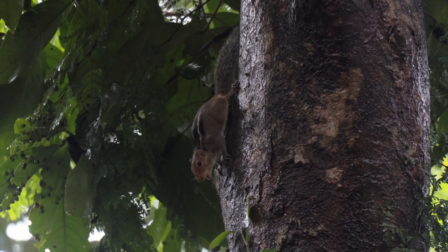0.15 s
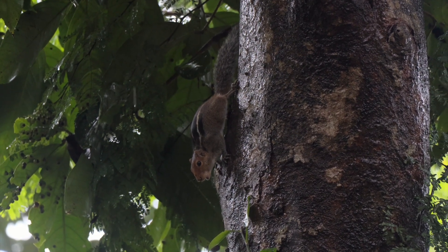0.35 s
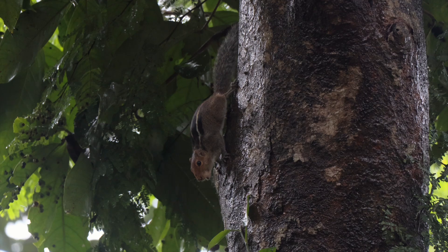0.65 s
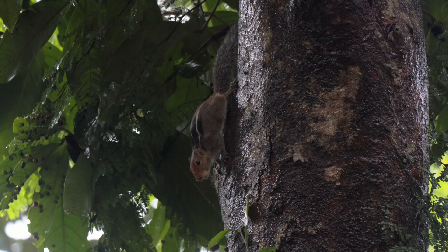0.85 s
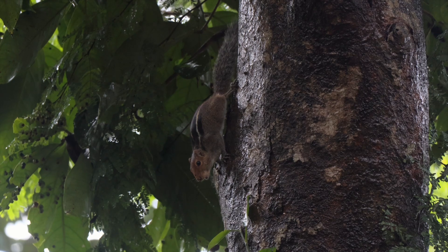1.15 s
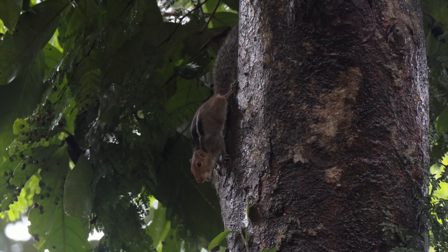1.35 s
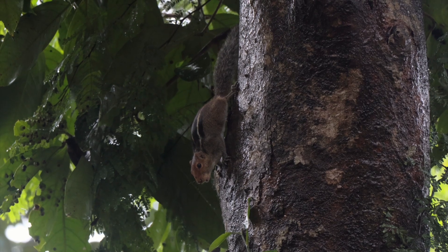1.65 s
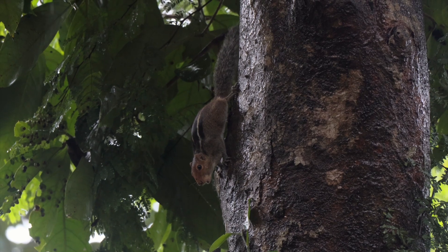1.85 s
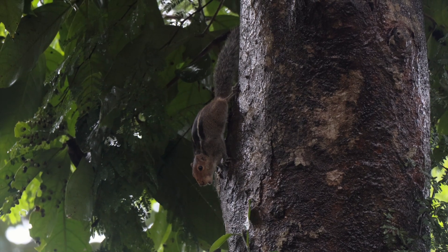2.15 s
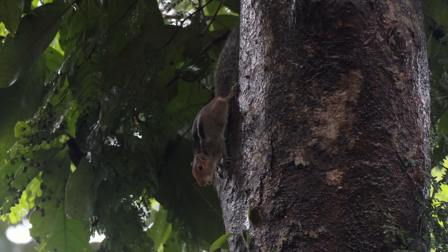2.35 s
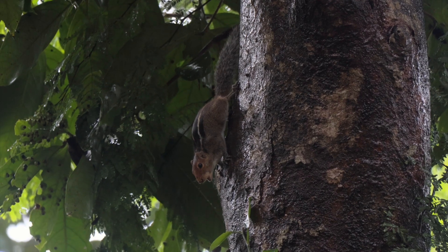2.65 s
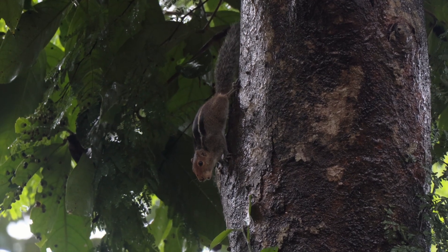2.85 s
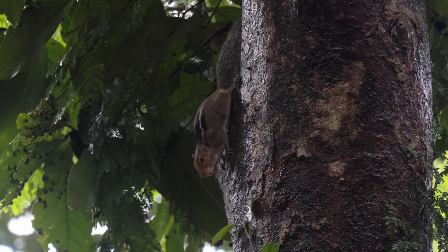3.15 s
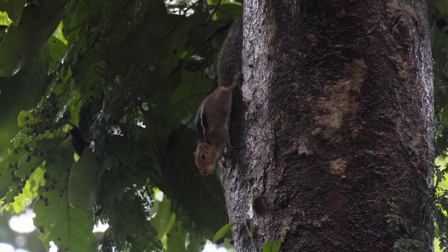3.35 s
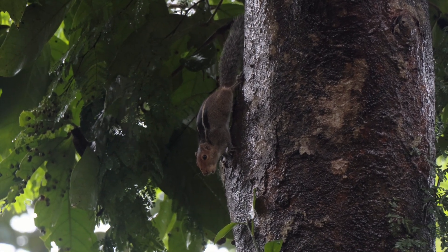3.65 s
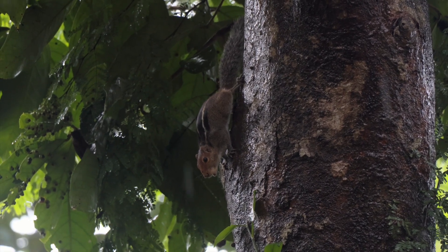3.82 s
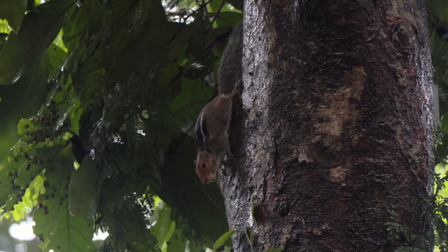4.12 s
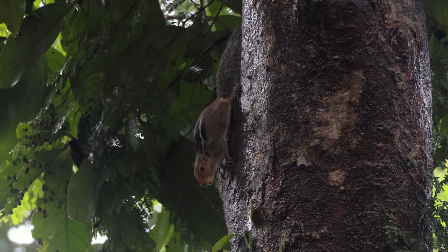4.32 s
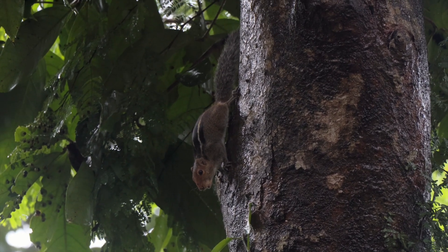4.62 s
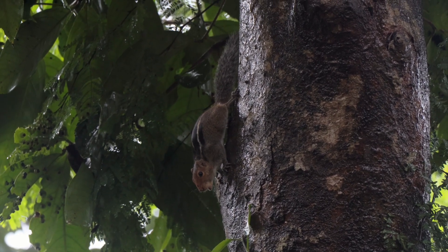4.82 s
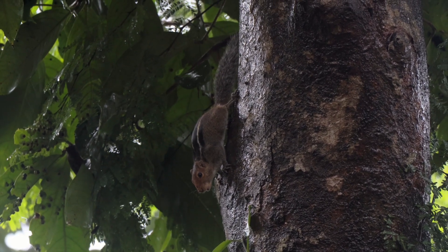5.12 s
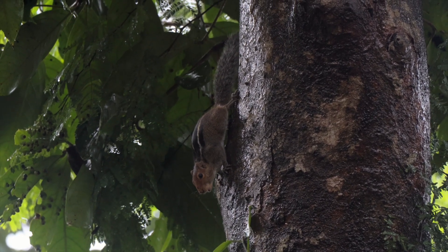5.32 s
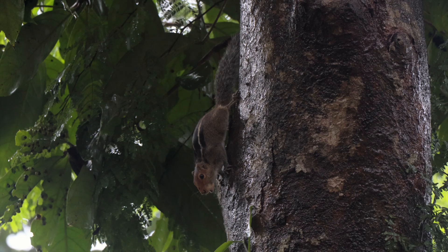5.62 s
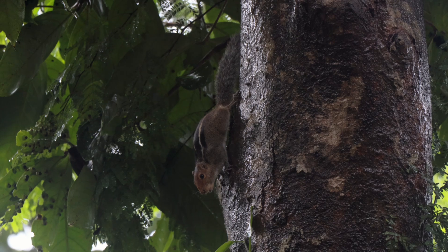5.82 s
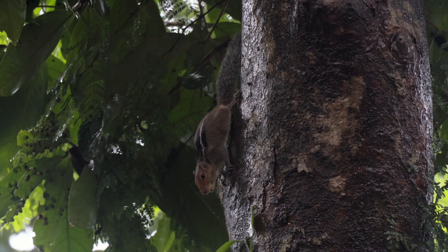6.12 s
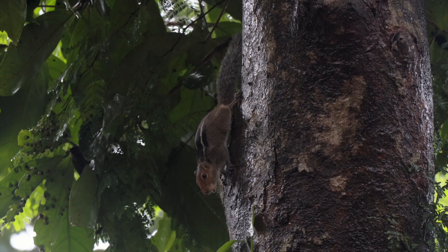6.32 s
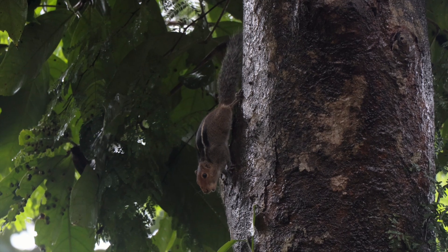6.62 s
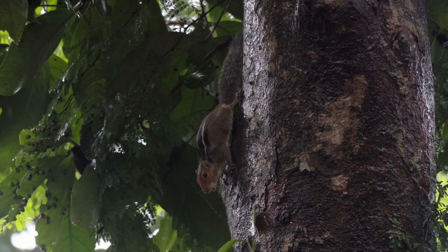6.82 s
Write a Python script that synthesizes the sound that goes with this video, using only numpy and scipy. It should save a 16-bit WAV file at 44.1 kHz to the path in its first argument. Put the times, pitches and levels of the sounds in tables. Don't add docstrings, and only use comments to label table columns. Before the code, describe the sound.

The end of a squirrel chirp opens the scene, then over twenty more calls run through all seven seconds, usually 0.3 to 0.4 seconds apart. Each lasts under a tenth of a second: a piercing whistle falling from about 4 to 2 kHz, with a quick upward bounce and final drop. A softer note closely follows the one at 0.25; the call at 4.1 slides longer. Faint low gulps follow many calls. Short branch and wall echoes blur into a brief airy tail. Light rain hisses steadily, with tiny leaf pops. Bright drips ring at 0.25, 1.77 and 5.0; leaf taps and thuds cluster around 2.3 to 2.8, with ticks near 4.4 and a fuller thud at 5.3. A thin insect hiss near 9 kHz persists. Distant traffic hum swells slightly around 2 and 5. The calls sit slightly left, within wide outdoor ambience; the last begins just before the cut.

```python
import sys
import numpy as np
from scipy import signal
from scipy.fft import rfft, irfft, next_fast_len
from scipy.io import wavfile
from scipy.ndimage import uniform_filter1d, map_coordinates

SR = 44100
rng = np.random.default_rng(int(sys.argv[2]) if len(sys.argv) > 2 else 0)


def dump(signal):
    limited = np.clip(np.atleast_2d(signal).T, -1, 1)
    pcm = np.round(limited * 32767).astype(np.int16)
    wavfile.write(sys.argv[1], SR, pcm)


def elevation(decibels):
    levels = np.asarray(decibels, float)
    return 10 ** (levels / 20)


N = 307377
PAD = SR // 10


def along(points, hz):
    point_hz, value = np.transpose(points)
    return np.interp(np.log(hz + 1), np.log(point_hz + 1), value)


def curve(rows, column):
    columns = np.transpose(rows)
    return np.interp(np.arange(N) / SR, columns[0], columns[column])


def unit(x):
    return x / np.sqrt(np.mean(x ** 2) + 1e-20)


def wobble(rate_hz):
    knots = rng.standard_normal(int(N * rate_hz / SR) + 4)
    return map_coordinates(knots, [np.arange(N) * rate_hz / SR])


def filtered(x, response):
    size = next_fast_len(x.shape[-1] + 8192)
    spectrum = rfft(x, size) * response(np.fft.rfftfreq(size, 1 / SR))
    return irfft(spectrum, size)[..., :x.shape[-1]]


def lagged(x, seconds):
    keep = np.exp(-1 / (abs(seconds) * SR))
    return signal.lfilter([1 - keep], [1, -keep], x)


def add(out, start_s, sound):
    part = out[..., round(start_s * SR):][..., :sound.shape[-1]]
    part += sound[..., :part.shape[-1]]


def lead(radians):
    return lambda hz: np.exp(1j * radians(hz) / 2 * np.array([[1], [-1]]))


# pitch_hz, likeness (1 same, -1 opposite)
LIKENESS = [(40, 1), (130, 0.86), (290, 0.9), (640, 0.96), (1400, 1), (3100, 0.84), (6800, 0.45),
            (15000, -0.72)]


def widen(pair, gain):
    def mid_side(hz):
        turn = np.arccos(np.clip(along(LIKENESS, hz), -1, 1)) / 2
        return gain(hz) * [np.cos(turn), np.sin(turn)]
    mid, side = filtered(pair, mid_side)
    return np.array([mid + side, mid - side])


# pitch_hz, density_db per Hz
HUM_COLOUR = [(15, -37), (25, -29), (65, 2), (151, -10.5), (200, -12.5), (260, -44), (440, -120)]
# time_s, level_db
TRAFFIC_LEVEL = [
    (0, -55),
    (.6, -57),
    (1.6, -56.5),
    (1.95, -51),
    (2.3, -57.5),
    (4.3, -54),
    (5.1, -50),
    (5.6, -54),
    (6.1, -51.5),
    (6.97, -54),
]


def traffic():
    level_db = curve(TRAFFIC_LEVEL, column=1) + 1.1 * wobble(2.92)
    hum = widen(rng.standard_normal((2, N)), lambda hz: elevation(along(HUM_COLOUR, hz)))
    return elevation(level_db + 0.7) * unit(hum)


# pitch_hz, density_db per Hz
RAIN_COLOUR = [(76, -15.5), (130, -9), (264, -5), (490, -6), (800, -4.5), (1580, -1.5), (2480, -0.5),
               (4380, -6), (8000, -10.5), (10000, -14.5), (12000, -13), (13400, -17.5), (15000, -17),
               (15900, -45)]
# time_s, level_db
SHOWER_LEVEL = [
    (0, -42.5),
    (3.3, -42.5),
    (4.3, -43),
    (5.1, -41.5),
    (5.7, -42.5),
    (6.3, -43.5),
    (6.97, -43.5),
]


def rain():
    noise = signal.stft(rng.standard_normal((2, N)), nperseg=512)[2]
    patches = rng.standard_normal(noise.shape[1:])
    patches = uniform_filter1d(uniform_filter1d(patches, 6, 0), 10, 1)
    hiss = unit(signal.istft(noise * elevation(2.5 * unit(patches)), nperseg=512)[1][:, :N])
    hits = (rng.random((2, N)) < 1500 / SR) * rng.standard_normal((2, N))
    hits = hits * elevation(3 * rng.exponential(size=(2, N)).clip(0, 3))
    bed = widen(hiss + 0.33 * unit(hits), lambda hz: elevation(along(RAIN_COLOUR, hz)))
    level_db = curve(SHOWER_LEVEL, column=1) + 7 + 0.6 * wobble(4.38)
    return elevation(level_db) * unit(bed)


def leaf_pops():
    pops = np.zeros((2, N))
    t = np.arange(SR // 40) / SR
    for when, pitch, size, side in rng.random((280, 4)):
        ring = elevation(-60 * t / 0.005) * np.sin(2 * np.pi * 500 * 8 ** pitch * t)
        ring = ring * (1 - np.exp(-t / .0006))
        pan = elevation([[3.5 * side - 1.2], [1.2 - 2.5 * side]])
        add(pops, when * N / SR, elevation(-44.5 + 10 * size ** 2) * ring * pan)
    return pops


# time_s, share of the higher band (0-1), level_db
INSECT_SONG = [
    (0, .7, -39),
    (1.0, 0.9, -41),
    (1.7, 0.8, -41.5),
    (2.3, .6, -42.5),
    (4.2, 0.32, -44),
    (5.3, 0.13, -41),
    (6.97, 0.4, -42),
]


def insect():
    share = curve(INSECT_SONG, column=1).clip(0, 1)
    level_db = curve(INSECT_SONG, column=2) + .5 * wobble(2.6)
    strokes = elevation(0.52 * wobble(140) + 1.1 * wobble(13))
    high = widen(rng.standard_normal((2, N)), lambda hz: np.exp(-((hz - 9030) / 430) ** 2))
    low = widen(rng.standard_normal((2, N)), lambda hz: np.exp(-((hz - 8760) / 400) ** 2))
    return elevation(level_db + 3.5) * unit(strokes * (np.sqrt(share) * high + np.sqrt(1 - share) * low))


# start_s, peak_db, body_db
DROP_TICKS = [(0.0344, -28, 18), (0.2364, -37, 4), (1.0614, -35, 15), (2.14, -43, -2), (2.7222, -27, 15),
              (3.3538, -35, -3), (4.3306, -25, 9), (4.4453, -28, 14), (4.8539, -28, -5.5),
              (5.1372, -53, 12), (5.5548, -42, -2), (5.6316, -31.5, 3), (5.7897, -36, 1), (6.8593, -52, -5)]
# start_s, peak_db, pitch_hz
DRIP_PLINKS = [
    (0.25, -11, 4930),
    (1.6866, -26, 4450),
    (1.766, -17, 5070),
    (5.005, -14, 4940),
]
# start_s, peak_db, pitch_hz
LEAF_TAPS = [
    (2.305, -23, 3440),
    (2.554, -13, 2340),
    (3.4175, -21, 1820),
    (4.4503, -21, 1990),
    (4.4657, -19.5, 3540),
    (5.901, -32, 2360),
]
# start_s, peak_db, pitch_hz
DROP_THUDS = [
    (2.152, -28, 1260),
    (2.302, -19, 1155),
    (2.385, -24, 1135),
    (2.759, -18, 315),
    (4.844, -24, 945),
    (5.196, -41, 864),
    (5.29, -21, 692),
    (6.333, -25, 304),
]


def drops():
    out, t = np.zeros((2, N)), np.arange(SR // 20) / SR
    for start_s, peak_db, body_db in DROP_TICKS:
        colour = [(800, -33), (1500, body_db - 9), (6000, body_db - 3.0), (10000, 2), (16000, 2)]
        snap = elevation(-60 * t / 0.014) * rng.standard_normal(len(t))
        snap = filtered(snap, lambda hz: elevation(along(colour, hz)))
        add(out, start_s, elevation(peak_db - 4.0) * snap)
    for start_s, peak_db, pitch_hz in DRIP_PLINKS:
        ring = np.sin(2 * np.pi * pitch_hz * t) * (1 - np.exp(-t / 0.00073))
        add(out, start_s, elevation(peak_db + 0.5 - 60 * t / 0.0083) * ring)
    for start_s, peak_db, pitch_hz in LEAF_TAPS:
        add(out, start_s, elevation(peak_db - 5.5 - 60 * t / 0.011) * np.sin(2 * np.pi * pitch_hz * t))
    for start_s, peak_db, pitch_hz in DROP_THUDS:
        unsteady = .12 * np.cumsum(rng.standard_normal(len(t)))
        thud = (1 - np.exp(-t / 0.0013)) * np.sin(2 * np.pi * pitch_hz * t + unsteady)
        add(out, start_s, elevation(peak_db - 11.0 - 60 * t / 0.11) * thud)
    return out


# delay_s, level_db
ECHO_TAPS = [(0.005, -14), (0.0093, -15), (0.0119, -15), (0.017, -19), (0.0202, -21), (0.025, -21),
             (0.0278, -22), (0.0376, -20), (0.0405, -17), (0.0432, -17), (0.1139, -25)]
# pitch_hz, t60_s
GROVE_DECAY = [(1800, 0.16), (2500, 0.55), (3500, 0.57), (6000, 0.61), (11000, 0.6)]
# pitch_hz, level_db
LEAF_RETURN = [(2000, -9), (2550, -6), (3100, 2)]
# pitch_hz, level_db
FOLIAGE_COLOUR = [(1810, -1), (2480, -4), (3610, -2), (4200, -7), (4950, -13), (5610, -2), (6410, -5),
                  (7410, -21.5), (12100, 0)]


def grove(x):
    hz, t, noise = signal.stft(rng.standard_normal((2, SR)), SR, nperseg=256)
    rise = np.clip(t / .025, 0, 1)
    rise = rise * elevation(along(LEAF_RETURN, hz)[:, None] * np.exp(-(t / .032) ** 4))
    decay = elevation(-60 * t / along(GROVE_DECAY, hz)[:, None])
    tail = signal.istft(noise * rise * decay, SR, nperseg=256)[1][:, :SR]
    reply = elevation(-8) * widen(tail / np.linalg.norm(tail[0]), lambda f: np.sqrt(2) + 0 * f)
    fade = elevation(-60 * np.arange(SR // 100) / SR / .005)
    for delay_s, level_db in ECHO_TAPS:
        clump = np.zeros((1, SR // 5))
        side_lag_s = rng.uniform(-5e-5, 5e-5)
        blur = unit(fade * rng.standard_normal(len(fade))) / np.sqrt(len(fade))
        add(clump, delay_s, elevation(level_db + 1.5) * blur)
        clump = filtered(clump, lambda f: elevation(along(LEAF_RETURN, f) * (delay_s < .03)))
        reply[:, :clump.shape[1]] += filtered(clump, lead(lambda f: 2 * np.pi * f * side_lag_s))
    coloured = filtered(x, lambda f: elevation(along(FOLIAGE_COLOUR, f)))
    return signal.fftconvolve(coloured[None], reply, axes=1)[:, :len(x)]


# start_s, peak_db, pitch_hz
GULP_EVENTS = [(0.801, -32, 792), (1.167, -39, 677), (1.517, -35.5, 687), (1.913, -27.5, 800),
               (2.844, -28.5, 800), (3.18, -32, 637), (3.601, -40, 633), (4.585, -55, 646),
               (4.978, -39, 686), (5.409, -34, 654), (5.746, -39, 796), (6.115, -36, 830),
               (6.426, -41, 940)]


def gulps():
    out, t = np.zeros(N), np.arange(SR // 10) / SR
    for start_s, peak_db, pitch_hz in GULP_EVENTS:
        glide_hz = pitch_hz * (1.12 - 5 * t)
        swell = elevation(peak_db - 4.0) * np.exp(-((t - .008) / 0.015) ** 2)
        add(out, start_s, swell * np.sin(2 * np.pi * np.cumsum(glide_hz) / SR))
    return out


def call_pitch(t, top_hz, fall_s, turn_s, turn_hz, low_hz):
    drop = low_hz + (top_hz - low_hz) * np.clip(1 - (t / fall_s) ** 1.2, 0, 1) ** 1.9
    drop += 126 * np.exp(-((drop - 2234) / 140) ** 2)
    bend = 3.8e6
    arch = turn_hz - bend * (t - turn_s) ** 2
    end_s = turn_s + np.sqrt(abs(turn_hz - 1700) / bend) + .004 + .1 * max(fall_s - turn_s, 0)
    pitch = np.maximum(np.where(t < turn_s, drop, 0), arch).clip(1700)
    pitch = uniform_filter1d(pitch, size=90)
    return pitch * (1 - 0.27 * np.exp(-t / 0.0016)), end_s


# start_s, level_db, top_hz, fall_s, bounce_top_hz
CALLS = [(-0.049, -13, 3860, 0.051, 2474), (0.2524, -10.5, 4054, .048, 1945),
         (0.706, -12, 3870, 0.053, 2485), (1.0722, -11.5, 3920, 0.05, 2412),
         (1.4222, -11.5, 3974, .051, 2000), (1.8164, -12, 3910, 0.055, 2544),
         (2.183, -11.5, 3980, 0.051, 2030), (2.386, -12.5, 4106, 0.068, 1870),
         (2.7502, -12, 3887, .048, 2424), (3.0854, -12, 3870, .052, 2488), (3.4968, -12, 3923, 0.054, 2070),
         (3.8748, -11.5, 3924, 0.049, 1990), (4.4863, -11.5, 3903, 0.049, 2060),
         (4.8907, -12.5, 3950, .047, 1990), (5.3045, -12, 3890, 0.052, 2466),
         (5.6555, -11.5, 3910, 0.051, 2390), (6.0179, -11, 3913, 0.055, 2387),
         (6.3416, -11.5, 3976, 0.053, 2377), (6.5759, -12.5, 4007, 0.059, 2380),
         (6.939, -12, 3810, 0.053, 2370)]
# start_s, level_db, top_hz, fall_s, turn_s, turn_hz
SLIDE_NOTES = [
    (0.3611, -16, 3370, .075, .012, 3040),
    (4.1025, -11.5, 4100, .062, .061, 2230),
]
# pitch_hz, level_db
MOUTH_GAIN = [(1700, -20), (1950, -17.5), (2150, -14.5), (2350, -7), (2500, -4), (2700, -8), (2900, -5),
              (3300, -0.5), (3600, 1.5), (4150, -2.5)]
# multiple, direct_db, scattered_db
OVERTONES = [(1, -4.5, -2), (2, -23, 0), (3, -24.5, -17.5), (4, -20, -23.5)]


def squirrel():
    direct, scattered = np.zeros(N + PAD), np.zeros(N + PAD)
    t = np.arange(SR // 10) / SR
    calls = [(start_s, level_db, top_hz, fall_s, fall_s + .0105, turn_hz)
             for start_s, level_db, top_hz, fall_s, turn_hz in CALLS]
    for start_s, level_db, top_hz, fall_s, turn_s, turn_hz in calls + SLIDE_NOTES:
        bounces = turn_s > fall_s
        spring = np.clip((turn_hz - 1900) / 550, 0, 1)
        low_hz = 1930 - 170 * spring if bounces else 2130
        pitch, end_s = call_pitch(t, top_hz, fall_s, turn_s, turn_hz, low_hz)
        attack = 1 - np.exp(-(t / .0052) ** 1.7)
        effort = np.clip((end_s - t) / 0.008, 0, 1) * elevation(level_db + along(MOUTH_GAIN, pitch))
        push_db = 3 * np.exp(-((t - turn_s - .002) / .006) ** 2)
        push_db -= 5 * np.exp(-((t - turn_s + .018) / .006) ** 2)
        effort = uniform_filter1d(effort * elevation(push_db * spring * bounces), size=40)
        phase = 2 * np.pi * np.cumsum(pitch) / SR
        for multiple, direct_db, scattered_db in OVERTONES:
            k = round(multiple)
            strain = (pitch / 3800) ** (1.64 * (k - 1))
            strain = strain * elevation((k - 1) * (level_db + 10.5))
            rough = unit(uniform_filter1d(rng.standard_normal(len(t)), size=40))
            flutter = 1 + .35 * (k - 1) * rough
            tone = np.sin(k * phase + rng.uniform(0, 2 * np.pi))
            wave = attack ** (1 / k) * effort * strain * flutter * tone
            add(direct, start_s + PAD / SR - .0005, elevation(direct_db) * wave)
            add(scattered, start_s + PAD / SR - .0005, elevation(scattered_db) * wave)
    direct_rolloff = [(13000, 1), (15500, -25)]
    return filtered(direct, lambda hz: elevation(along(direct_rolloff, hz))), scattered


# pitch_hz, phase_radians
PORT_PHASE = [(1000, 0.025), (3500, 0.47), (7000, 0.47), (10500, 0.92)]


def scene():
    direct, scattered = squirrel()
    placed = filtered(direct, lead(lambda hz: along(PORT_PHASE, hz))) * elevation([[.4], [-.4]])
    voice = elevation(9.5) * (placed + grove(scattered))[:, PAD:]
    return traffic() + rain() + leaf_pops() + insect() + drops() + gulps() + voice


def roll_off(x):
    return signal.sosfilt(signal.butter(12, 15720, fs=SR, output="sos"), x)


def record(dry):
    attack_s, release_s, threshold_db, slope = .011, 0.056, -32, 0.15
    power = lagged(lagged(np.mean(dry ** 2, 0), attack_s), release_s)
    loud_db = 10 * np.log10(power + 1e-12)
    steadied = dry * elevation(-slope * (loud_db - threshold_db).clip(0))
    heard = filtered(steadied, lambda hz: hz < 15730)
    return roll_off(heard)


dry = scene()
out = record(dry)
dump(out)
```